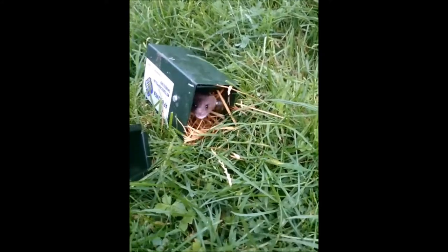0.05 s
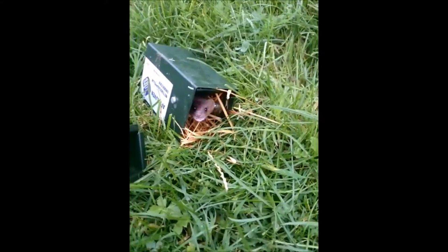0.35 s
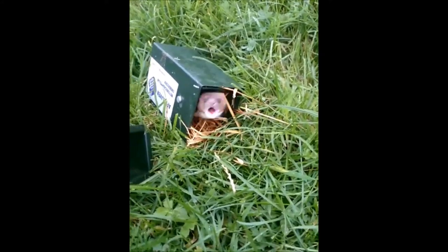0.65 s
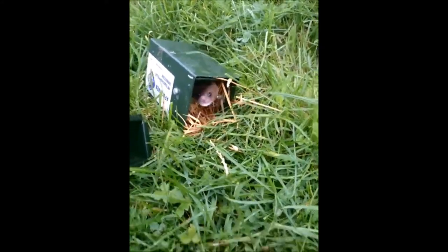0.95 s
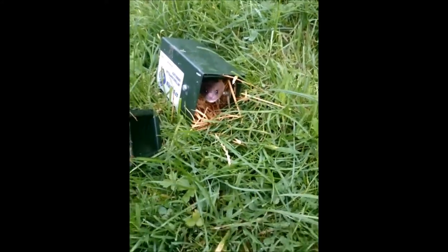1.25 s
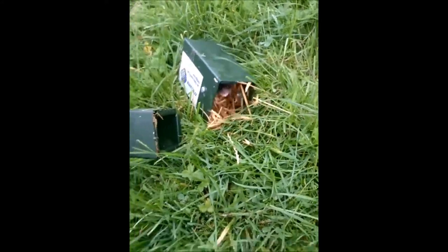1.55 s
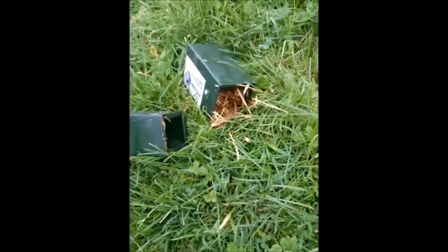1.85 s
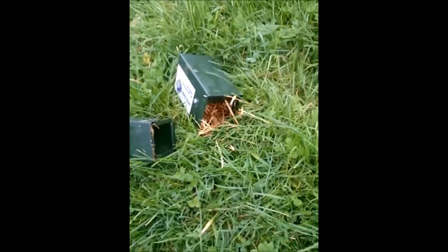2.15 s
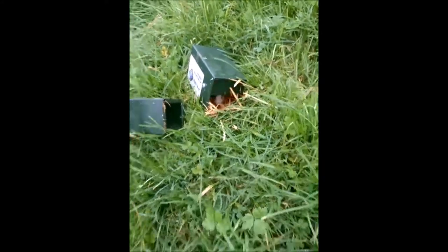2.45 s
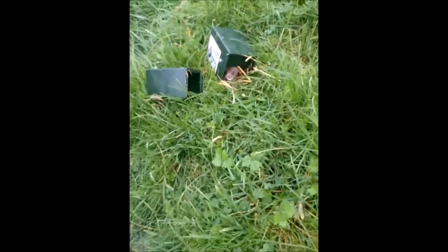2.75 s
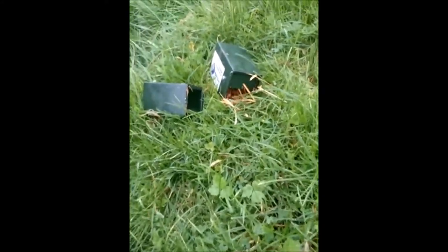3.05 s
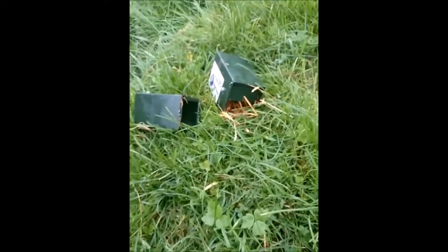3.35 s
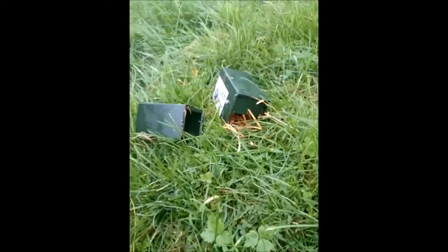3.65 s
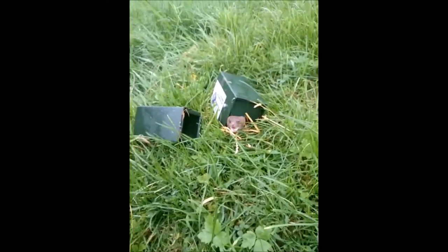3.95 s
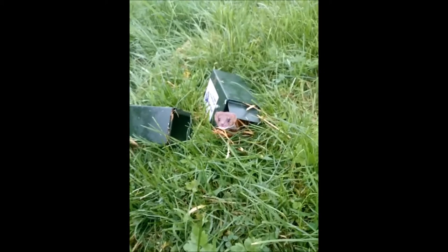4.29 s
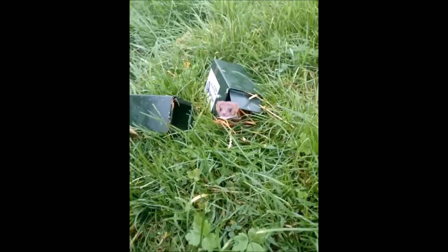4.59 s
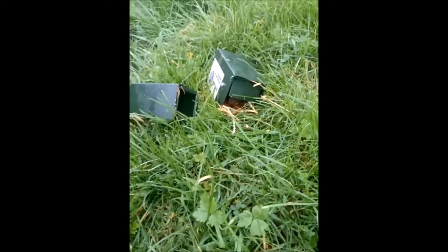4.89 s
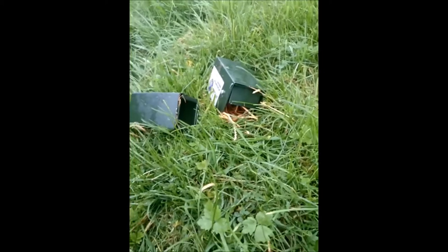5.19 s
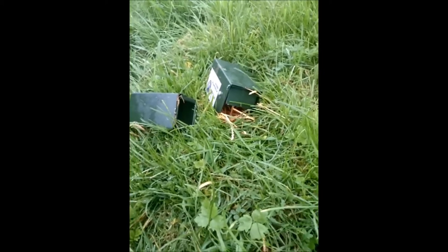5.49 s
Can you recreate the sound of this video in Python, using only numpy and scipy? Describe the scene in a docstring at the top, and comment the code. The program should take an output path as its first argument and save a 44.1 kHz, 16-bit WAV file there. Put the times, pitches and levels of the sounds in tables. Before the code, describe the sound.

A weasel in a box trap gives five short, harsh, high shrieking barks at uneven intervals, so close that they overload the microphone. Between them it hisses, spits and clicks its mouth quietly. Midway, someone steps through meadow grass, brushing blades and snapping a few stalks. Low wind rumbles on the microphone throughout, and a far bird whistles faintly twice.

```python
"""Trapped weasel in a meadow

A weasel in a box trap gives five harsh shrieking barks, so close that they overload the microphone.
Between them it hisses, spits and clicks its mouth. Someone steps back through the grass, brushing
blades and snapping stalks. Wind rumbles on the microphone; a far bird calls twice over a distant wash."""
import sys
import numpy as np
from scipy import signal
from scipy.fft import rfft, irfft, next_fast_len
from scipy.io import wavfile

SR = 44100
rng = np.random.default_rng(int(sys.argv[2]) if len(sys.argv) > 2 else 0)


def persist_wave(psi):
    """Save psi, clipped to +-1, as 16-bit WAV."""
    counts = np.round(np.clip(psi, -1, 1) * 32767).astype(np.int16)
    wavfile.write(sys.argv[1], SR, np.atleast_2d(counts).T)


N = 252693
TIME = np.arange(N) / SR

# spectrum of spits and of the snap that ends a bark: (frequency [Hz], density [dB])
SNAP_SPECTRUM = [(1500, -13.5), (3000, -11), (6000, -1.5), (8000, 1.5), (10000, -7), (16000, -14.5)]


def from_db(db):
    """Decibels to gain."""
    return 10 ** (np.asarray(db) / 20)


def rms_one(x):
    """Scale to unit power."""
    return x / np.sqrt(np.mean(x ** 2) + 1e-20)


def pan(db):
    """Stereo gains, left over right by db."""
    return from_db([[db / 2], [-db / 2]])


def cut(x, hz, kind, order=2):
    """Butterworth low- or high-pass."""
    return signal.sosfilt(signal.butter(order, min(hz, .45 * SR), kind, fs=SR, output="sos"), x + 1e-18)


def bell(x, hz, width_hz, db):
    """Lift or dip a band."""
    band = signal.lfilter(*signal.iirpeak(hz, hz / (width_hz * from_db(-db / 2)), fs=SR), x)
    return x + (from_db(db) - 1) * band


def ring(x, hz, t60_s):
    """One decaying resonance."""
    radius, angle = from_db(-60 / (t60_s * SR)), 2 * np.pi * hz / SR
    return signal.lfilter([0, np.sin(angle)], [1, -2 * radius * np.cos(angle), radius ** 2], x + 1e-18)


def gate(start_s, end_s, edge_s):
    """Window with sloping edges."""
    return np.clip(np.minimum(TIME - start_s, end_s - TIME) / edge_s + .5, 0, 1)


def hump(centre_s, half_width_s):
    """Gaussian envelope of height 1."""
    return np.exp(-((TIME - centre_s) / half_width_s) ** 2)


def bursts(events, decay_s):
    """Sudden decaying envelopes, one per (time [s], level [dB])."""
    return sum(from_db(db) * (TIME >= s) * np.exp(-np.abs(TIME - s) / decay_s) for s, db in events)


def drift(hz):
    """Unit-power random wander, low-passed at hz."""
    return rms_one(cut(rng.standard_normal(N + SR), hz, "low")[SR:])


def noise(spectrum, correlation):
    """Unit-power stereo noise from (frequency [Hz], density [dB])."""
    hz, db = np.transpose(spectrum)
    size = next_fast_len(N)
    bins_hz = np.fft.rfftfreq(size, 1 / SR)
    gain = from_db(np.interp(np.log(bins_hz + 1), np.log(hz), db, left=-120))
    mid, side = irfft(rfft(rng.standard_normal((2, size))) * gain)[:, :N]
    return rms_one(np.sqrt(1 + correlation) * mid + np.sqrt(1 - correlation) * side * [[1], [-1]])


def rough_tone(phase, width_hz):
    """Chaotic vibration: tumbling amplitude and phase widen a line to a band."""
    return rms_one(drift(width_hz) * np.cos(phase) + drift(width_hz) * np.sin(phase))


def wind():
    """An easing, gusty breeze buffets mostly the right microphone port; the rumble dips briefly."""
    # gusts, and brief dips in the rumble's level: (centre [s], half-width [s], change [dB])
    swings = [(0.497, 0.046, 7), (2.22, 0.021, 6.5), (2.97, 0.09, 5), (3.108, 0.042, -13.5),
              (3.354, 0.068, 6), (5.403, 0.049, -6.5)]
    # rumble in the exposed port: (frequency [Hz], density [dB])
    exposed_spectrum = [(3, -2), (8, -5), (14, -9), (25, -16), (43, -23.5), (65, -29), (100, -32),
                        (150, -37), (200, -41), (300, -48.5), (500, -67.5), (1500, -90.5)]
    # rumble in the sheltered port: (frequency [Hz], density [dB])
    lee_spectrum = [(20, -3), (80, -1), (130, -8.5), (200, -9), (300, -16.5), (500, -29), (1500, -57)]
    easing_db_per_s, fade_in_s = 0.76, .02
    swing_db = sum(db * hump(s, half_width_s) for s, half_width_s, db in swings)
    strength = from_db(-42 - easing_db_per_s * TIME + swing_db) * np.minimum(TIME / fade_in_s, 1)
    exposed = from_db(18.5) * strength * noise(exposed_spectrum, correlation=0)[1]
    sheltered = from_db(-22.5) * np.sqrt(strength) * noise(lee_spectrum, correlation=0)[0]
    return np.array([sheltered, exposed])


def distant_wash():
    """Faint noise of the countryside all around."""
    # level curve: (time [s], level [dB])
    levels = [(0.0, -62.5), (1.57, -62), (1.78, -58.5), (2.89, -58.5), (4.76, -63), (5.7, -62)]
    # wash: (frequency [Hz], density [dB])
    spectrum = [(200, -9), (300, 0), (480, -10), (750, -5.5), (1100, -3), (1500, -10.5), (2000, -17.5),
                (2800, -22.5), (4500, -26), (6500, -25.5), (9000, -33.5), (16000, -37)]
    level_db = np.interp(TIME, *np.transpose(levels))
    return from_db(4.5 + level_db) * pan(1.2) * noise(spectrum, correlation=0.37)


def hisses():
    """Each hiss builds, fades as the air runs out, and stops."""
    # breaths: (start [s], length [s], attack [s], level [dB], fade [dB/s])
    breaths = [(0.01, 0.593, 0.0067, -53.5, 4.5), (2.97, 0.32, 0.043, -49, 43),
               (4.787, 0.494, 0.085, -45.5, 44.5)]
    # hiss: (frequency [Hz], density [dB])
    spectrum = [(2500, -4), (4000, -10.5), (5500, -1.5), (6900, 5), (8500, -6.5), (11000, -13.5),
                (14000, -11), (16000, -22)]
    envelope = 0
    for s, length_s, attack_s, db, fade_db_per_s in breaths:
        attack = np.clip((TIME - s) / attack_s, 0, 1)
        fade = from_db(db - fade_db_per_s * np.clip(TIME - s, 0, length_s))
        envelope += attack * fade * gate(s, s + length_s, edge_s=0.008)
    return from_db(-6.5) * envelope * noise(spectrum, correlation=0.067)


def spits():
    """Short, thin puffs of noise from the mouth."""
    # puffs: (start [s], length [s], level [dB])
    puffs = [(0.044, 0.026, -41), (0.71, 0.028, -58.5), (0.84, 0.02, -41.5), (1.583, 0.036, -45),
             (1.864, 0.013, -41.5), (4.157, 0.013, -40.5)]
    envelope = sum(from_db(db) * gate(s, s + length_s, edge_s=0.0067) for s, length_s, db in puffs)
    return from_db(-2) * cut(envelope * noise(SNAP_SPECTRUM, correlation=0.1563), 5000, "high")


def sough():
    """One early gust sings faintly through the grass."""
    spectrum = [(1100, -23), (1700, -5), (2400, -26), (6000, -63)]
    return from_db(-60) * hump(centre_s=0.44, half_width_s=0.19) * noise(spectrum, correlation=.3)


def mouth_clicks():
    """Wet clicks as the jaws part ring the mouth cavity."""
    # clicks: (time [s], level [dB])
    clicks = [(0.839, -36.5), (0.846, -39.5), (2.197, -46.5), (2.644, -36), (4.141, -34.5), (4.878, -49.5)]
    # mouth resonances: (frequency [Hz], gain [dB], t60 [s])
    modes = [(2259, -6.5, .04), (2665, -15, .015), (3520, -13, 0.016), (5004, -13, .012),
             (7890, -3.5, 0.0027)]
    touch = bursts(clicks, decay_s=0.0035) * noise([(1000, 0.0047), (16000, 0.0041)], correlation=0.25)
    cavity = sum(from_db(db) * ring(touch, hz, t60_s) for hz, db, t60_s in modes)
    return from_db(-0.5) * touch + from_db(-11) * cavity


def barks():
    """Rough shrieks that flick up, sag and end in a snap. Returns (audible, ultrasound)."""
    # barks: (start [s], length [s], force [dB], top pitch [Hz], end pitch [Hz], snap [dB],
    #         ultrasound [dB], ultrasound pan [dB], shriek swell [dB])
    calls = [(0.858, 0.103, -1.5, 5987, 5002, -6, 2, 5, 7), (1.598, 0.1, -1, 6052, 4864, -7.5, 0, 4.5, 0),
             (1.882, 0.023, -4, 5898, 5688, -9, -15, -6.5, 0),
             (2.678, 0.07, 0, 5963, 5477, -2.5, -3, 4, -1),
             (4.164, 0.047, -2.5, 6300, 5950, -7.5, -2, 2.5, -1.5)]
    # rasp: (frequency [Hz], density [dB])
    rasp_spectrum = [(1500, -13), (3500, -8), (5000, -5), (6300, -0.5), (7200, -8.5), (8500, -4),
                     (10500, -8), (13000, -11), (16000, -11.5)]
    force, closing, effort, swell_db, contour = 0, 0, 0, 0, []
    for s, length_s, db, top_hz, end_hz, snap_db, ultra_db, pan_db, rise_db in calls:
        end_s = s + length_s
        progress = np.clip((TIME - s) / length_s, 0, 1)
        arch = np.abs(np.sin(np.pi * progress ** 0.78)) ** 0.64
        force += from_db(db) * gate(s + .002, end_s - .003, edge_s=.005)
        swell_db += rise_db * (progress - .5) * gate(s, end_s, edge_s=.002)
        closing += from_db(snap_db) * hump(end_s - 0.0027, half_width_s=0.0036)
        effort += from_db(ultra_db) * pan(pan_db) * arch
        contour += [(s, .9 * top_hz), (s + .17 * length_s, top_hz),
                    (s + 0.45 * length_s, .75 * end_hz + 0.27 * top_hz), (end_s, end_hz)]
    pitch_hz = np.interp(TIME, *np.transpose(contour)) + 130 * drift(hz=140)
    phase = 2 * np.pi * np.cumsum(pitch_hz) / SR
    tone = np.sin(phase) + 1.1 * rough_tone(phase, width_hz=340)
    # the shriek swells as it sinks into the resonance of the open mouth
    shriek = from_db(swell_db - 10) * bell(tone, hz=5200, width_hz=820, db=4.5)
    # bouncing out of the box, it reaches the left port by another path
    bounced = from_db(-14) * shriek + from_db(-11) * rough_tone(phase, width_hz=240)
    rasp = from_db(-11.5) * pan(0.93) * noise(rasp_spectrum, correlation=0.099)
    snap = closing * noise(SNAP_SPECTRUM, correlation=0.18)
    ultrasound = effort * noise([(17000, 0), (22000, 0)], correlation=.4)
    flutter = from_db(1.4 * drift(hz=150))
    return force * flutter * (np.array([bounced, shriek]) + rasp) + snap, ultrasound


def overload(audible, ultrasound):
    """A bark saturates the capsules; its rectified ultrasound splatters down into the bass."""
    rectified = cut(np.tanh((ultrasound / 1.343) ** 2), 33, "high")
    splatter = from_db(-1) * cut(rectified, 5400, "low")
    bass = from_db(-2) * cut(rectified, 500, "low", order=1)
    saturated = .8 * np.tanh(audible / .8)
    return cut(saturated + splatter + bass, 13000, "low", order=1)


def reflections(voice):
    """The box rings briefly, grass scatters a faint tail, a far hedge returns a smeared echo."""
    box_t60_s, grass_t60_s, hedge_delay_s, hedge_smear_s = 0.072, 1.0, .12, 0.011
    t = TIME[:SR // 2]
    box = from_db(-17) * rms_one(from_db(-60 * t / box_t60_s))
    scatter = from_db(-41.5) * rms_one(from_db(-60 * t / grass_t60_s))
    hedge = from_db(-44.5) * rms_one(np.exp(-((t - hedge_delay_s) / hedge_smear_s) ** 2))
    near, far = rng.standard_normal((2, 2, len(t))) / np.sqrt(len(t))
    box_response = bell(box * near, hz=3400, width_hz=1400, db=9)
    foliage_response = cut((scatter + hedge) * far, 5500, "high")
    # the shriek is beamed forwards, so mostly the rasp comes back
    off_axis = bell(voice, hz=5500, width_hz=1300, db=-8)
    return pan(1.5) * signal.fftconvolve(off_axis, box_response + foliage_response, axes=1)[:, :N]


def grass_brushes():
    """Blades bend past the boots, flick back in small ticks and settle."""
    # boot strokes: (peak time [s], level [dB], swell [s])
    strokes = [(1.74, -37.5, 0.041), (1.805, -38, 0.053), (2.0, -48.5, 0.023), (2.275, -41.5, 0.057),
               (2.45, -52, 0.06), (2.87, -38, 0.051), (2.939, -36.5, 0.049), (3.015, -44.5, 0.032),
               (3.215, -50.5, 0.036), (3.41, -57, 0.049), (5.56, -58, 0.032), (5.635, -61, 0.025)]
    # rustle: (frequency [Hz], density [dB])
    spectrum = [(1200, -20.5), (2000, -11.5), (4000, -9), (6000, -2.5), (8000, -2.5), (11000, -5),
                (14000, -6), (16000, -4)]
    flicks_per_s, tick_decay_s, settle_per_swell = 160, .0004, 0.93
    flicks = (rng.random(N) < flicks_per_s / SR) * rng.exponential(1, N)
    ticks = signal.lfilter([1], [1, -np.exp(-1 / (tick_decay_s * SR))], flicks + 1e-18)
    grains = rms_one(from_db(drift(hz=60.5)) + 0.9 * ticks)
    power = 0
    for s, db, swell_s in strokes:
        settling = np.exp(-np.abs(TIME - s) / (settle_per_swell * swell_s))
        power += (from_db(db) * np.where(TIME < s, hump(s, swell_s), settling)) ** 2
    return from_db(-5.5) * pan(1.1) * np.sqrt(power) * grains * noise(spectrum, correlation=.1)


def far_bird():
    """A nearly pure whistle, slurred upwards and held."""
    # calls: (start [s], level [dB], pitch ratio)
    calls = [(2.139, -63, 0.96), (5.118, -56, 1.0)]
    # note contour: (time from start [s], pitch [Hz], level [dB])
    note = [(0, 3100, -24), (.022, 3600, -16), (.037, 4400, 0), (.06, 4350, -4), (.085, 4300, -12),
            (.11, 4300, -30)]
    note_s, note_hz, note_db = np.transpose(note)
    whistles = 0
    for start_s, call_db, ratio in calls:
        pitch_hz = ratio * np.interp(TIME - start_s, note_s, note_hz) + 35 * drift(hz=160)
        level_db = call_db + np.interp(TIME - start_s, note_s, note_db, left=-120, right=-120)
        whistles += from_db(level_db) * np.sin(2 * np.pi * np.cumsum(pitch_hz) / SR)
    return whistles


def stalk_snaps():
    """A few stalks break with a short crack."""
    # snaps: (time [s], level [dB])
    snaps = [(2.374, -41), (2.497, -33.5), (2.5508, -38.5), (2.7918, -26.5), (3.2341, -39.5), (3.4145, -35)]
    crack = noise([(1200, -20.5), (3000, -10), (15000, -16)], correlation=0.21)
    return from_db(-9.5) * pan(-7) * bursts(snaps, decay_s=0.0021) * crack


def scene():
    """The weasel close by, the meadow around it."""
    voice, ultrasound = barks()
    barking = overload(voice, ultrasound) + reflections(voice)
    mouth = pan(6) * (mouth_clicks() + spits() + hisses())
    steps = grass_brushes() + stalk_snaps()
    return barking + mouth + steps + far_bird() + wind() + distant_wash() + sough()


def record(dry):
    """Each microphone port colours its side; peaks are rounded and the top is cut."""
    # port peaks and dips: (channel, frequency [Hz], width [Hz], gain [dB])
    ports = [(0, 8040, 1830, 4.5), (0, 11100, 1520, 5.5), (0, 11950, 804, -6.5), (0, 13600, 1500, 5.5),
             (1, 5400, 1203, 0.5)]
    cutoff_hz = 15700
    sides = list(dry)
    for channel, hz, width_hz, db in ports:
        sides[round(channel)] = bell(sides[round(channel)], hz, width_hz, db)
    rounded = 1.161 * np.tanh(np.array(sides) / 1.179)
    return signal.sosfilt(signal.ellip(10, .3, 70, cutoff_hz, fs=SR, output="sos"), rounded)


dry = scene()
out = record(dry)
persist_wave(out)
```